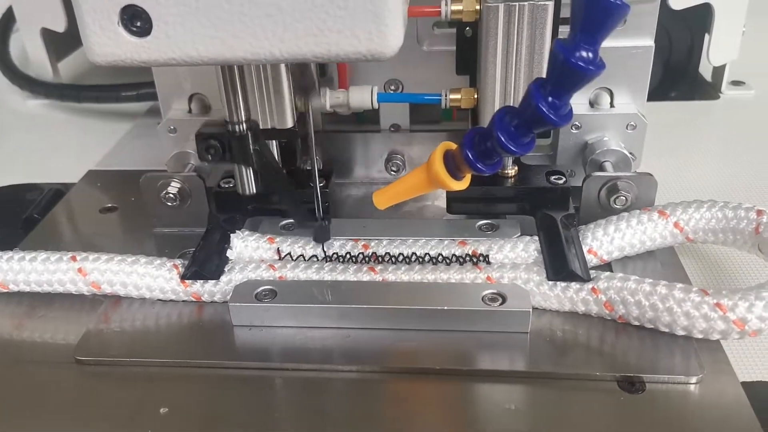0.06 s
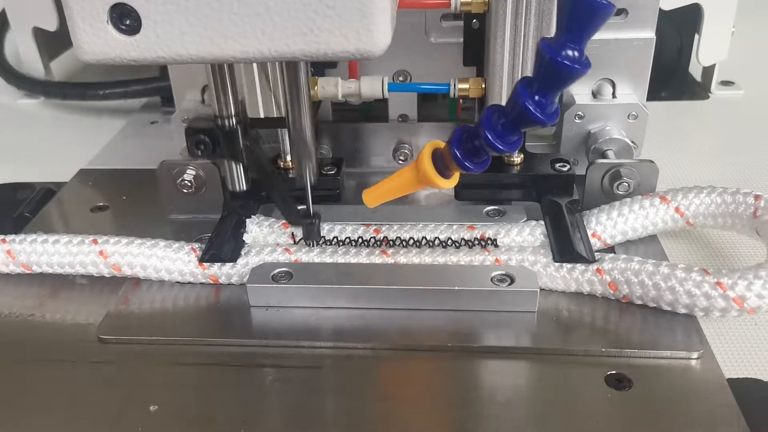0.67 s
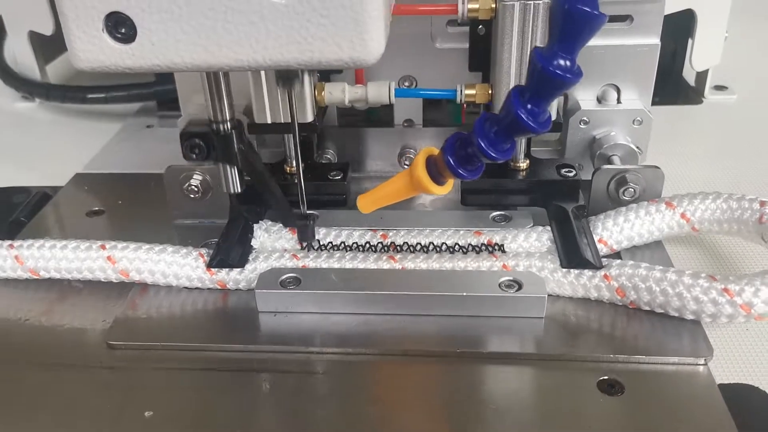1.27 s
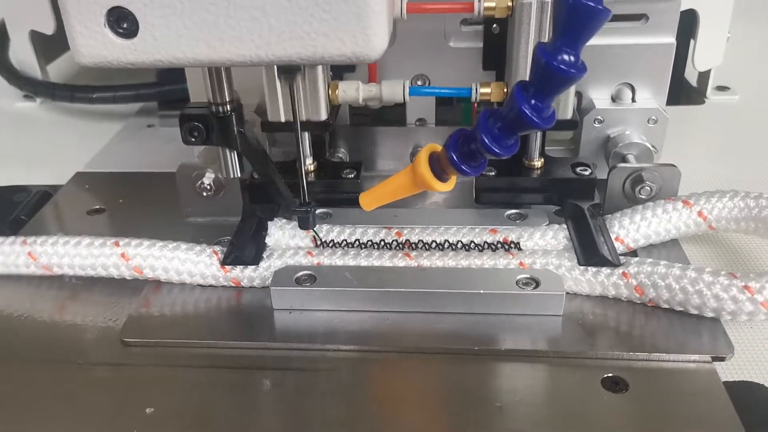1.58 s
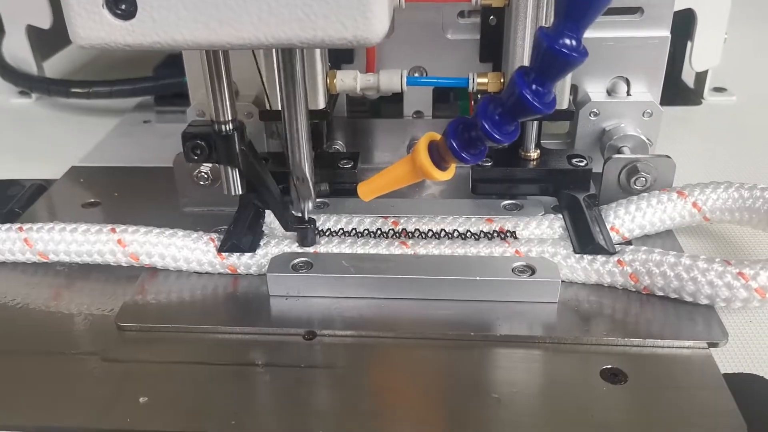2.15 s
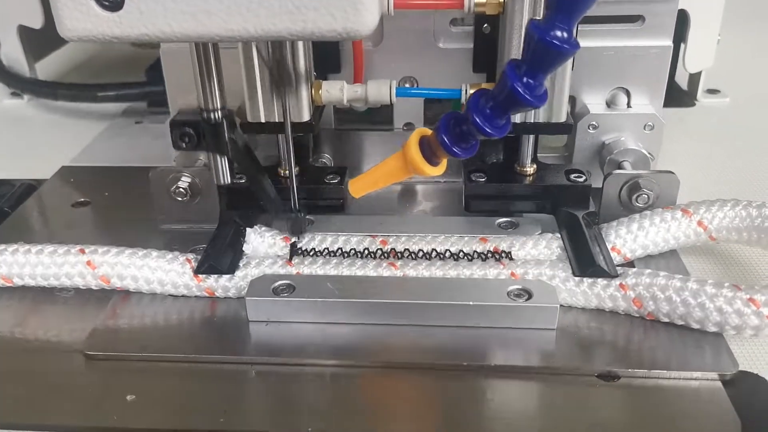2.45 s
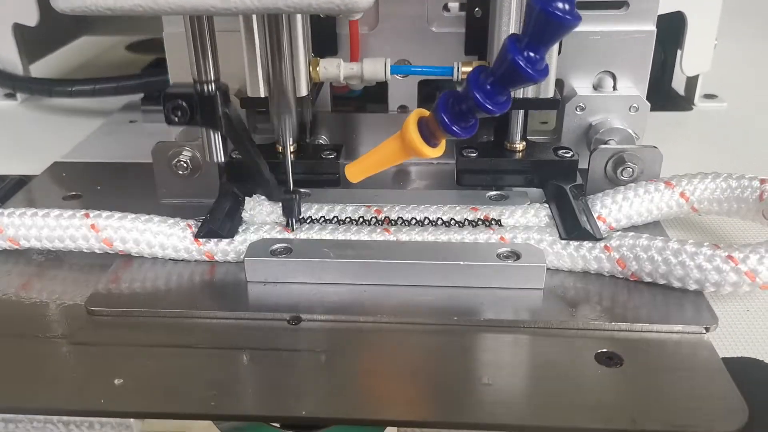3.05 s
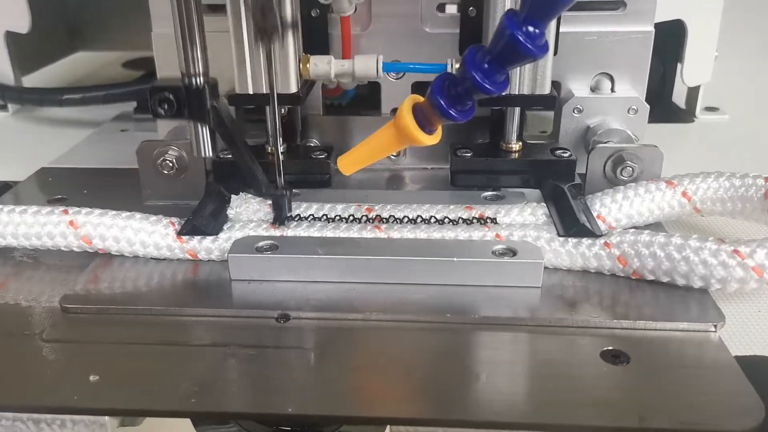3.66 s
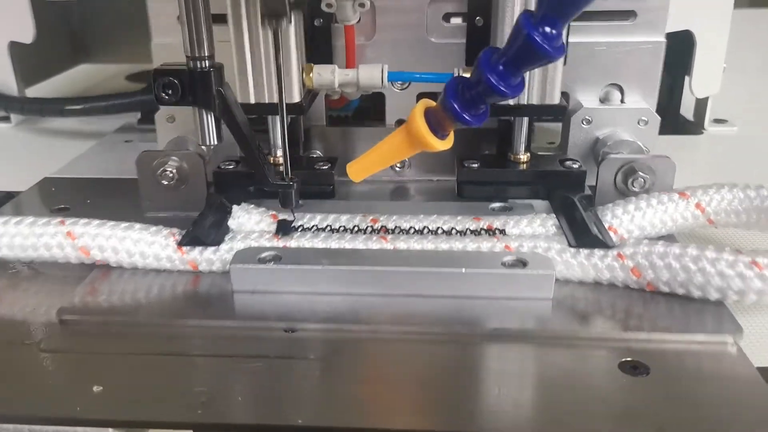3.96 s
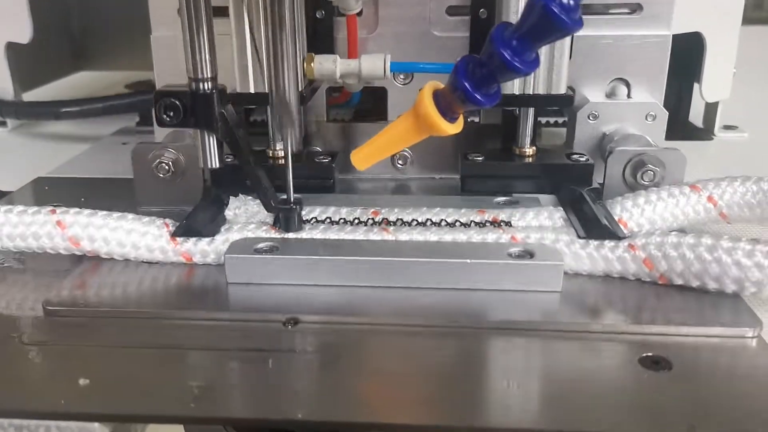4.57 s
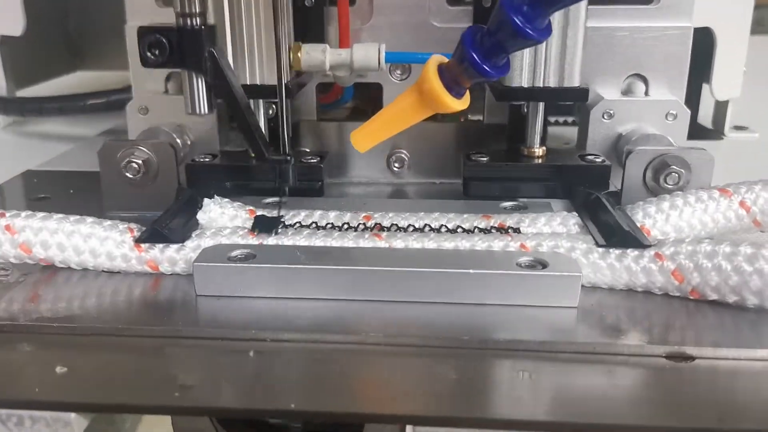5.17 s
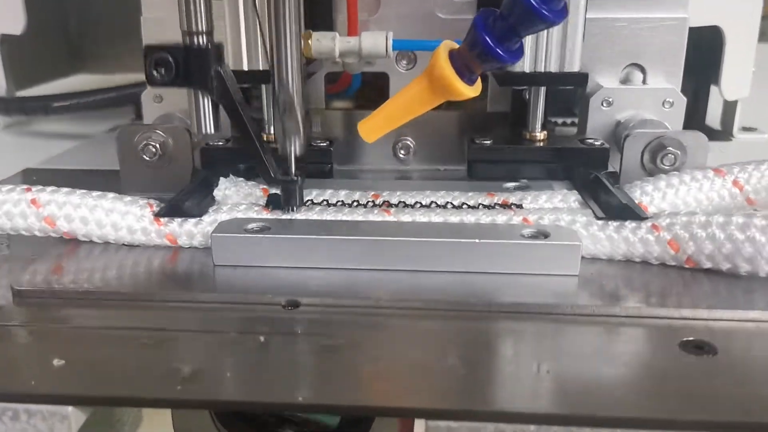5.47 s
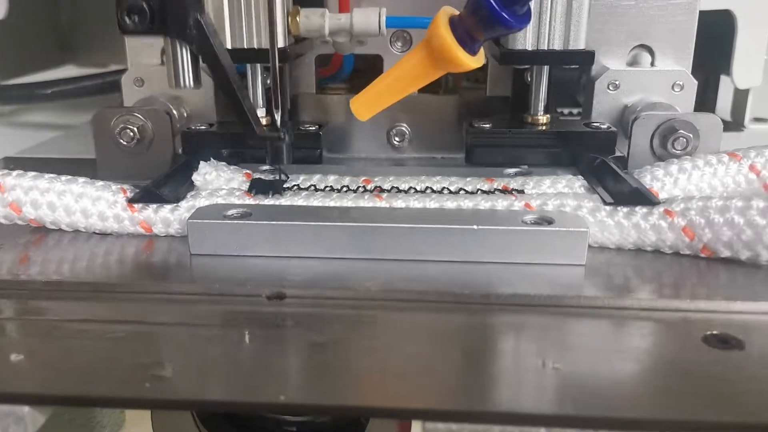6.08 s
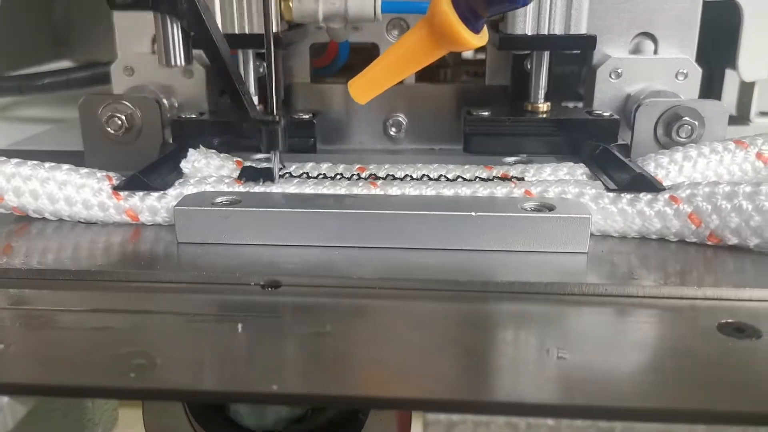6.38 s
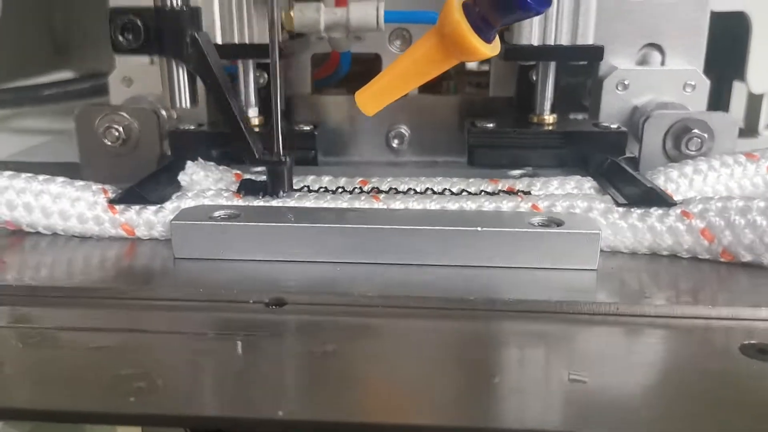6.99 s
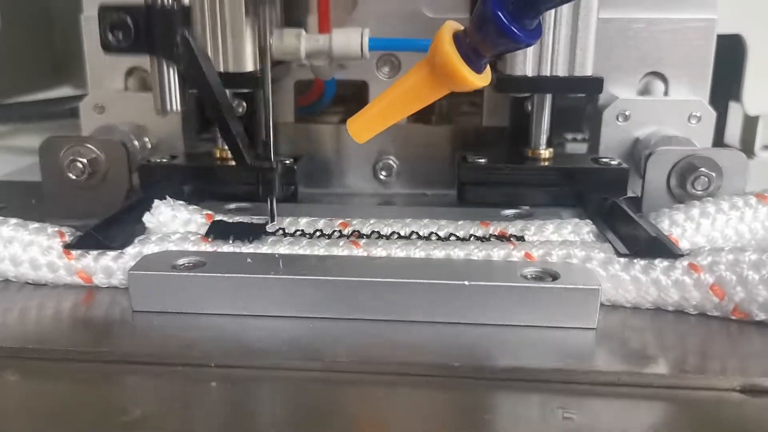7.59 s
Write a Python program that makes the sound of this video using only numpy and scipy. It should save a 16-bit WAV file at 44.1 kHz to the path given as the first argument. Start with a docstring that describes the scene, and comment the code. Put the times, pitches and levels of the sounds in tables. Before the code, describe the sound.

In a rumbling workshop, a heavy sewing machine runs through rope at an even pace, with a light metallic knock and a short motor growl on every stitch. A bright air hiss dominates throughout, flipping between two tones in time with the needle and flaring briefly now and then. A slightly longer growl comes early on, and the knocks become clearer in the second half as the microphone draws near.

```python
"""A jet of cooling air hisses at the needle of a pattern sewing machine as it zigzags through thick rope.
The air hits the rope and the clamp that holds it. Each stitch, about four a second, shifts the clamp
in or out, so the hiss flips between two colours. Under it the feed motors growl, the needle bar knocks
once a stitch, loose parts tick and the workshop rumbles. The microphone slowly moves closer."""
import sys
import numpy as np
from scipy import signal
from scipy.fft import rfft, irfft
from scipy.io import wavfile

SR = 44100
rng = np.random.default_rng(int(sys.argv[2]) if len(sys.argv) > 2 else 0)


def materialize(psi):
    """Save the field psi as 16-bit PCM at rate SR to the path in sys.argv[1].

    A 1-D psi becomes a single channel; in a 2-D psi each row is a channel.
    """
    bounded = np.clip(np.atleast_2d(psi).T, -1, 1)
    quanta = np.round(bounded * 32767).astype(np.int16)
    wavfile.write(sys.argv[1], SR, quanta)


N = 346185
TIME = np.arange(N) / SR
BIN_HZ = np.maximum(np.arange(N // 2 + 1) * SR / N, 1)

STITCHES_PER_S = 4.19
PAIR_S = 2 / STITCHES_PER_S   # the pattern repeats after a pair of stitches: one zig, one zag
PAIR_STARTS = np.arange(-1, N / SR / PAIR_S + 1) * PAIR_S
SWING_S = 0.018   # how long the clamp takes to shift in or out


def air_jet(nearness, swing_in_s=.1663, swing_out_s=.411, edge_hz=4580, edge_width_hz=1480):
    """Air breaks on the rope and hisses; colour and loudness change as the clamp swings in and out."""
    # the hiss from far and from near, with the clamp out and in:
    # f/Hz, left level/dB, right level/dB, left-right likeness, left lead/rad
    far_out = [(453, -36.5, -41, 0.8, 0.5), (905, -32, -34, 0.66, 0.6), (1420, -29.5, -32.5, 1, 1.2),
               (2150, -24.5, -28.5, 1, 1.1), (3270, -28.5, -26, 0.66, 0.54), (3930, -29, -31, 0.48, -6.5),
               (5250, -26.5, -26, 0.45, -4), (6350, -23.5, -23.5, 0.47, -4), (7530, -30.5, -21.5, 0.72, -3),
               (8080, -36.5, -30, 0.49, 1), (10900, -41.6, -29.5, 0.32, 9.5), (11500, -69.2, -45, 0.16, 25),
               (12500, -41.9, -36.5, 0.33, -3), (15000, -44, -41.5, 0.3, 10)]
    far_in = [(450, -36, -40.5, 0.97, 0.9), (900, -33.5, -35.5, 0.48, -0.05), (1420, -30.0, -33, 1, 1.22),
              (2220, -23.5, -25.5, 0.91, 1), (3140, -29.5, -29, 0.35, 0.05), (4040, -24, -23, 0.69, 1.47),
              (5000, -24.5, -20, 0.46, -0.15), (6320, -24, -24.5, 0.65, -4), (7100, -24.5, -23, 0.87, -2.5),
              (8050, -35, -36, 0.94, -5), (10640, -45, -26, 0.42, -2), (11400, -59, -43.5, 0.09, 8),
              (12500, -44, -35, 0.25, -4.5), (15000, -43.0, -42.7, 0.24, -1)]
    near_out = [(462, -34.5, -37, 0.67, 0.1), (950, -26.5, -27.5, 0.56, 0.4),
                (1420, -23, -29.5, 0.71, 0.99), (2220, -28, -28.5, 0.72, 0.3),
                (3220, -29.5, -25, 0.64, 1.97), (4150, -21.5, -23, 1, 2.22), (5220, -28, -20, 0.28, 3.1),
                (6220, -31, -27.5, 0.24, 5.1), (7340, -32.2, -24.5, 0.62, 4.2), (8600, -30, -25, 0.41, 4.8),
                (10800, -38.5, -27, 0.26, 6.7), (11500, -49, -53, 0.2, 10.9), (12500, -37, -36, 0.61, 8.3),
                (15000, -43.5, -42.6, 0.46, 15.9)]
    near_in = [(454, -36.5, -41, 0.46, 0.4), (950, -28.5, -30, 0.91, 1.1), (1400, -23, -27.5, 0.99, 1.14),
               (2250, -33, -33, 0.63, 0.9), (3300, -29, -28.5, 0.47, 2.5), (4300, -27.5, -19.5, 0.35, 2.06),
               (5240, -25, -22.5, 0.44, -0.9), (6000, -29, -25.5, 0.34, 2.5), (7300, -34, -24.5, 0.67, 4),
               (8400, -32.5, -26.5, 0.46, 5.5), (10770, -38.5, -31, 0.32, 5), (11500, -47, -44, 0.3, 0),
               (12400, -42, -40, 1, 4), (15000, -39, -42, 0.37, 10)]
    # air rings in the gaps between plate, clamp and head:
    # f/Hz, width/Hz, boost with clamp out/dB, boost with clamp in/dB
    gaps_far = [(1283, 420, 7.5, 7.5), (1817, 136, 7, 3), (2298, 42, 10, 1), (3000, 310, 8.5, 7.5),
                (3627, 350, 8.5, 5.5), (4140, 106, 11, 4), (5320, 140, 5, 4), (6700, 130, 2, 2.5),
                (7570, 110, -1.5, 8.5), (9160, 360, 5.5, 6), (9500, 180, 0, 4), (10160, 240, 3, 5.5)]
    gaps_near = [(1407, 95, 4.5, 3), (1920, 550, 6.5, 6.5), (2410, 345, 8, 11), (2945, 555, 10, 8),
                 (3550, 250, 1.5, 11), (4042, 320, 9.5, 8.5), (4620, 360, 8, 6.5), (5270, 315, 8.5, 6.5),
                 (5790, 210, 12, 5.5), (6680, 320, 6.5, 4), (8170, 90, -11, 7), (9550, 150, 11, 3),
                 (9630, 130, -3, 8.5), (9670, 760, -7.5, -2)]
    # air rushes over the edge of the machine's foot, with the clamp out and in: t/s, boost/dB
    edge_out = [(0, 1), (1.5, 4), (2.45, 4), (3.0, 0), (5.8, -0.1), (7.6, -1)]
    edge_in = [(0, -1.5), (1.7, -0.3), (4.1, 2.5), (4.9, 0), (5.9, 0.5), (6.6, -0.5)]
    pair_time = TIME % PAIR_S
    inside_s = np.minimum(pair_time - swing_in_s, swing_out_s - pair_time)
    clamp_in = np.clip(inside_s / SWING_S + .5, 0, 1)   # 0 is out, 1 is in
    far = hiss_at_one_spot(far_out, far_in, gaps_far, clamp_in)
    near = hiss_at_one_spot(near_out, near_in, gaps_near, clamp_in)
    hiss = crossfade(far, near, nearness)
    edge_band = 1 / (1 + (2 * (BIN_HZ - edge_hz) / edge_width_hz) ** 4)
    edge_rush = irfft(rfft(hiss) * edge_band, N)
    edge_db = blend(in_time(edge_out)[0], in_time(edge_in)[0], clamp_in)
    hiss_db = -1 - nearness * (1 - clamp_in)
    return from_db(hiss_db) * (hiss + (from_db(edge_db) - 1) * edge_rush)


def hiss_at_one_spot(out_spectrum, in_spectrum, gaps, clamp_in, bass_cut_hz=364):
    """The hiss from one place: the clamp's position fades between two sets of ringing air gaps."""
    # narrow bands where the steel plate rings, and two narrow high bands above 12 kHz: f/Hz, width/Hz, boost/dB
    narrow_peaks = [(2880, 45, 3), (4080, 80, 0.5), (5100, 89, 2), (9320, 100, 0), (12100, 180, 9.5),
                    (14745, 160, 5)]
    peak_hz, peak_width_hz, peak_db = np.transpose(narrow_peaks)
    gap_hz, gap_width_hz, out_db, in_db = np.transpose(gaps)
    bass_cut_db = -10 * np.log10(1 + (bass_cut_hz / BIN_HZ) ** 6)   # a thin jet makes almost no bass
    common_db = bass_cut_db + humps(peak_hz, peak_width_hz) @ peak_db
    gap_peaks = humps(gap_hz, gap_width_hz)
    hiss_out = coloured_noise(out_spectrum, gap_peaks @ out_db + common_db)
    hiss_in = coloured_noise(in_spectrum, gap_peaks @ in_db + common_db)
    return crossfade(hiss_out, hiss_in, clamp_in)


def wavering_hiss(hiss, depth_db=1.3, changes_per_s=9, bands=12):
    """Each band of the hiss wavers, swelling and sinking a little on its own."""
    centres_hz = np.geomspace(800, 12000, bands)
    drifts = rng.standard_normal((bands, 200))
    spectrum, out = rfft(hiss), 0
    for share, drift in zip(np.eye(bands), drifts):
        band = irfft(spectrum * np.interp(BIN_HZ, centres_hz, share), N)
        drift_db = depth_db * np.interp(TIME * changes_per_s, np.arange(len(drift)), drift)
        out = out + band * from_db(drift_db)
    return out


def breathy_ring(width_hz=90):
    """The jet blows across a gap: a narrow band of noise on a slowly rising pitch."""
    # the course of the ring: t/s, f/Hz, level/dB
    ring = [(0, 1822, -54), (3.5, 1845, -49), (3.85, 1870, -44.5), (4.6, 1900, -43.5), (4.85, 1970, -43),
            (5.25, 1974, -46), (5.55, 1986, -40.5), (5.9, 2090, -52), (6.2, 2130, -56)]
    hz, db = in_time(ring)
    lowpass = signal.butter(2, width_hz / 2, fs=SR, output="sos")
    flutter = signal.sosfilt(lowpass, rng.standard_normal((2, N)))
    angle = 2 * np.pi * np.cumsum(hz) / SR
    return from_db(db) * (flutter[0] * np.cos(angle) + flutter[1] * np.sin(angle)) / flutter.std()


def hiss_flares():
    """Now and then a short, bright swell of noise rises over the hiss."""
    # single swells of noise: middle t/s, half length/s, f/Hz, width/Hz, level/dB
    flares = [(.79, 0.055, 5200, 350, -36), (1.09, .08, 4110, 130, -39), (1.52, .06, 4090, 130, -38.5),
              (2.702, .08, 5280, 400, -36), (3.158, .085, 5250, 450, -37), (3.65, .08, 5250, 400, -37),
              (4.46, 0.0055, 6000, 900, -28), (4.72, .006, 5900, 700, -34), (4.889, 0.045, 2500, 1000, -43),
              (5.52, 0.11, 3830, 650, -34)]
    out = 0
    for at_s, half_s, hz, width_hz, db in flares:
        loudness = from_db(db) * np.exp(-((TIME - at_s) / half_s) ** 2)
        out = out + loudness * band_noise(hz, width_hz, likeness=.5)
    return out * left_right_db(-1.5, .5)


def needle_puffs():
    """The needle's holder cuts through the jet on each stroke and makes a puff."""
    # puffs in a pair of stitches: middle t/s, half length/s, f/Hz, width/Hz, level/dB
    puffs = [(0.162, 0.0088, 5900, 1500, -35.5), (0.35, .007, 6000, 1300, -35),
             (0.158, .008, 7100, 2100, -36)]
    return noise_bursts(puffs, likeness=-.069, uneven_db=1) * left_right_db(-2, 1.5)


def feed_motors(travel_end_s=2.03):
    """Motors growl at each shift of the clamp: harder as it travels, softer once it sews on the spot."""
    # tones in a pair of stitches, from the main drive and from the feed (travelling, then on the spot):
    # middle t/s, half length/s, f/Hz, level/dB
    drive_tones = [(0.19, .045, 53.5, -53), (.46, 0.04, 61, -46), (.026, 0.013, 767, -44),
                   (0.21, 0.013, 768, -45)]
    travel_tones = [(0.245, 0.026, 190, -40), (.44, 0.038, 192, -42), (0.19, .03, 74, -46),
                    (0.416, 0.04, 130, -47), (0.18, 0.021, 335, -45.5)]
    spot_tones = [(.203, 0.036, 129, -41.5), (0.449, 0.041, 129, -44), (0.256, 0.044, 178.6, -48),
                  (0.0148, 0.043, 189, -48), (.222, 0.031, 276, -46.5), (.46, .04, 278, -50),
                  (.205, 0.022, 349, -50.5)]
    # rubbing and rushing in a pair of stitches: middle t/s, half length/s, f/Hz, width/Hz, level/dB
    growls = [(0.2, 0.047, 180, 300, -45.5), (0.447, 0.065, 177, 250, -46), (0.19, 0.067, 337, 156, -49),
              (0.434, 0.064, 328, 130, -48), (.258, 0.0099, 550, 890, -38.5),
              (0.018, 0.013, 540, 970, -39.5), (0.18, 0.043, 675, 340, -44), (0.418, 0.049, 670, 280, -44),
              (0.208, 0.04, 81, 41, -49.5), (0.47, 0.042, 120, 40, -48)]
    on_spot = np.clip((TIME - travel_end_s) / SWING_S, 0, 1)
    tones = motor_hum(drive_tones) + blend(motor_hum(travel_tones), motor_hum(spot_tones), on_spot)
    growl = noise_bursts(growls, likeness=.9, uneven_db=.6) * from_db(blend(3, 1.5, on_spot))
    return tones * left_right_db(-2.2, -1) + growl * left_right_db(-1.7, -1.3)


def motor_hum(tones, pitch_spread=.02):
    """A motor starts and stops for each stitch and briefly makes the frame hum."""
    out = 0
    for at_s, half_s, hz, db in tones:
        loudness, pair = repeating_swell(at_s, half_s, uneven_db=.6)
        pitch_slip, start_cycles = rng.standard_normal((2, len(PAIR_STARTS)))[:, pair]
        from_middle_s = TIME - at_s - pair * PAIR_S
        cycles = hz * (1 + pitch_spread * pitch_slip) * from_middle_s + start_cycles
        out = out + from_db(db) * loudness * np.sqrt(2) * np.sin(2 * np.pi * cycles)
    return out


def braking_growl(start_s=1.58, rise_s=.04, hold_s=.34, fall_s=.067, sag_db_per_s=17):
    """A longer growl as the clamp brakes at the end of its travel: it sets in, sags and stops."""
    bandpass = signal.butter(3, [160, 420], "band", fs=SR, output="sos")
    noise = signal.sosfilt(bandpass, stereo(rng.standard_normal((2, N)), likeness=.96))
    corners_s = np.cumsum([start_s, rise_s, hold_s, fall_s])
    sag_db = sag_db_per_s * np.maximum(TIME - corners_s[1], 0)
    loudness = np.interp(TIME, corners_s, [0, 1, 1, 0]) * from_db(-43.3 - sag_db)
    return loudness * noise / noise.std()


def needle_bar(nearness, uneven_db=2, jitter_s=.00106):
    """The bar that carries the needle knocks once a stitch and sets the machine's head ringing."""
    # knocks in a pair of stitches: t/s, level from far/dB, level from near/dB
    knocks = [(.131, -43, -39), (.374, -47, -39.5)]
    # the notes the head rings with: f/Hz, level/dB, time to fade by 60 dB/s
    head_notes = [(580, -10, .05), (722, -5.5, 0.065), (820, -10, 0.03), (961, 2.5, 0.11), (1290, 5, 0.055),
                  (1420, -4, .05)]
    at_s, far_db, near_db = np.transpose(knocks)
    times = PAIR_STARTS[:, None] + at_s + jitter_s * rng.standard_normal((len(PAIR_STARTS), len(knocks)))
    knock_db = blend(far_db, near_db, np.interp(times, TIME, nearness))
    heard = (times > 0) & (times < TIME[-1])
    out = 0
    for hz, db, fade_s in head_notes:
        strengths = from_db(knock_db + db + uneven_db * rng.standard_normal(times.shape))
        clicks = np.zeros(N)
        clicks[(times[heard] * SR).astype(int)] = strengths[heard]
        out = struck(clicks, hz, fade_s) - out   # neighbouring notes start in opposite directions
    return out * left_right_db(1.5, -1.5)


def loose_parts(ticks_per_s=30, spread_db=3):
    """Small steel parts touch at random; each touch is a faint tick of eight short notes."""
    touching = rng.random(N) < ticks_per_s / SR
    touches = touching * from_db(-40 + spread_db * rng.standard_normal(N))
    return sum(struck(touches * stereo(rng.standard_normal((2, N)), likeness=.6), hz, fade_s=.01)
               for hz in np.geomspace(1390, 5900, 8))


def workshop_rumble(nearness):
    """Motor and workshop make a low rumble that grows a little as the microphone nears."""
    # the rumble: f/Hz, left level/dB, right level/dB, left-right likeness, left lead/rad
    rumble = [(20, -52, -47, .85, 0), (38, -55, -50, .85, 0), (58, -41, -41.5, 0.91, 0),
              (98, -40.5, -40.5, .95, 0), (200, -44.5, -42, 0.89, 0), (372, -45, -45.5, 0.94, 0),
              (780, -81, -87, 0.71, 0), (3000, -100, -100, .5, 0)]
    return coloured_noise(rumble, extra_db=7.25) * from_db(1.5 * nearness)


def noise_bursts(rows, likeness, uneven_db):
    """Short bursts of noise that repeat with every pair of stitches."""
    out = 0
    for at_s, half_s, hz, width_hz, db in rows:
        loudness, _ = repeating_swell(at_s, half_s, uneven_db)
        out = out + from_db(db) * loudness * band_noise(hz, width_hz, likeness)
    return out


def repeating_swell(at_s, half_s, uneven_db):
    """One smooth swell per pair of stitches, each of its own strength; also gives the pair's number."""
    turns = (TIME - at_s) / PAIR_S
    pair = np.round(turns).astype(int)
    strength = from_db(rng.normal(0, 1, len(PAIR_STARTS)) * uneven_db)
    return strength[pair] * np.exp(-((turns - pair) * PAIR_S / half_s) ** 2), pair


def struck(clicks, hz, fade_s):
    """Each click starts a pure tone that fades by 60 dB in fade_s."""
    decay, step = from_db(-60 / (fade_s * SR)), 2 * np.pi * hz / SR
    return signal.lfilter([0, np.sin(step)], [1, -2 * decay * np.cos(step), decay ** 2], clicks + 1e-18)


def band_noise(hz, width_hz, likeness):
    """Stereo noise in one band of frequencies, with an average (rms) size of 1."""
    low_hz = np.hypot(hz, width_hz / 2) - width_hz / 2
    bandpass = signal.butter(2, [low_hz, low_hz + width_hz], "band", fs=SR, output="sos")
    noise = signal.sosfilt(bandpass, stereo(rng.standard_normal((2, N)), likeness))
    return noise / noise.std()


def coloured_noise(spectrum, extra_db):
    """Stereo noise shaped by a table; the lead is how far the left wave runs ahead of the right."""
    hz, *columns = np.transpose(spectrum)
    left_db, right_db, likeness, lead = [np.interp(np.log(BIN_HZ), np.log(hz), c) for c in columns]
    gains = from_db(np.array([left_db, right_db]) + extra_db) * np.exp(.5j * lead * [[1], [-1]])
    real, imaginary = rng.standard_normal((2, 2, len(BIN_HZ)))
    white = (real + 1j * imaginary) * np.sqrt(N / 2)
    return irfft(stereo(white, likeness) * gains, N)


def stereo(noises, likeness):
    """Mixes two noises into left and right: likeness 0 is unrelated, 1 is almost the same."""
    alike = np.clip(likeness, -.98, .98)
    return np.sqrt((1 + alike) / 2) * noises[0] + np.sqrt((1 - alike) / 2) * noises[1] * [[1], [-1]]


def humps(hz, width_hz):
    """One hump of height 1 around each given frequency."""
    return 1 / (1 + (2 * (BIN_HZ[:, None] - hz) / width_hz) ** 2)


def in_time(rows):
    """Joins a table's points with straight lines, giving each column a value at every sample."""
    times, *columns = np.transpose(rows)
    return [np.interp(TIME, times, column) for column in columns]


def blend(a, b, share):
    """Goes from a at share 0 to b at share 1."""
    return a + (b - a) * share


def crossfade(a, b, share):
    """Fades from noise a to noise b with no dip in loudness halfway."""
    return np.sqrt(1 - share) * a + np.sqrt(share) * b


def from_db(db):
    """Turns decibels into a factor to multiply by."""
    return 10 ** (np.asarray(db) / 20)


def left_right_db(left, right):
    """One factor for each side, from decibels."""
    return from_db([[left], [right]])


def scene():
    """Jet, needle and motors over the rumble; the machinery grows louder as the microphone nears."""
    # the microphone's approach: t/s, nearness (0 is far, 1 is near)
    approach = [(0, 0.04), (2.2, 0.02), (4.0, 0.17), (5.5, 0.88), (7.85, 1)]
    nearness = in_time(approach)[0]
    hiss = wavering_hiss(air_jet(nearness))
    ring = breathy_ring() * left_right_db(-.5, -1.5)
    knocks = needle_bar(nearness)
    puffs = needle_puffs()
    rumble = workshop_rumble(nearness)
    flares = hiss_flares()
    ticks = loose_parts()
    motors = (feed_motors() + braking_growl()) * from_db(blend(-5, -3, nearness))
    return hiss + ring + flares + puffs + motors + knocks + ticks + rumble


def record(dry, cutoff_hz=15150):
    """The highest treble is cut off steeply."""
    return signal.sosfilt(signal.ellip(16, .1, 80, cutoff_hz, fs=SR, output="sos"), dry)


dry = scene()
out = record(dry)
materialize(out)
```